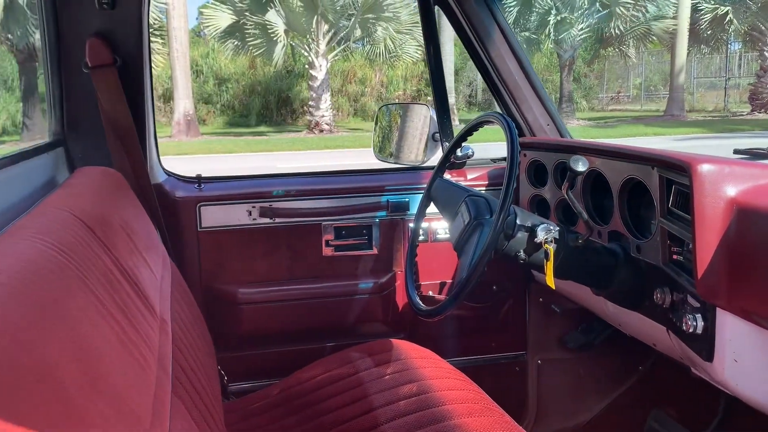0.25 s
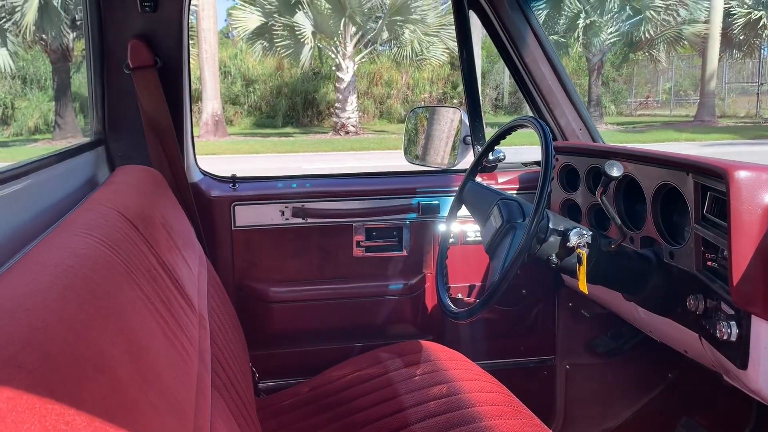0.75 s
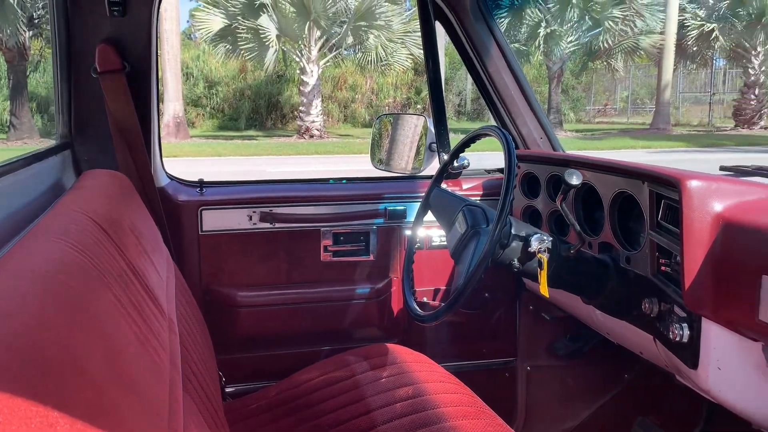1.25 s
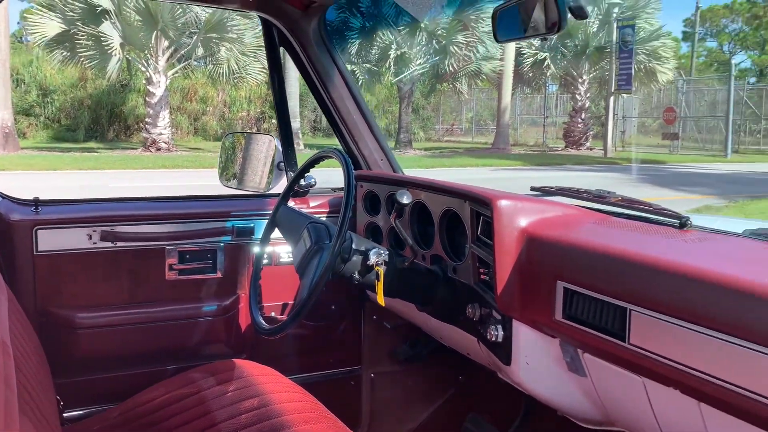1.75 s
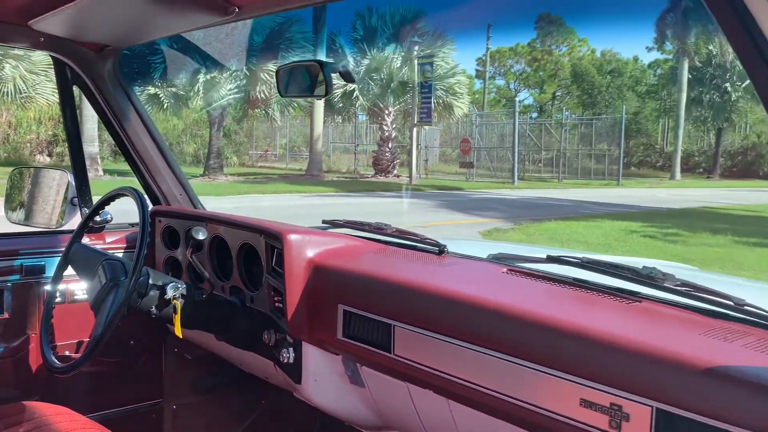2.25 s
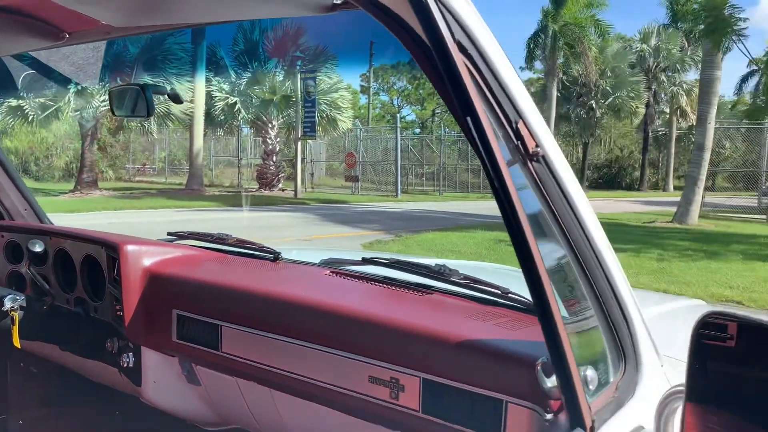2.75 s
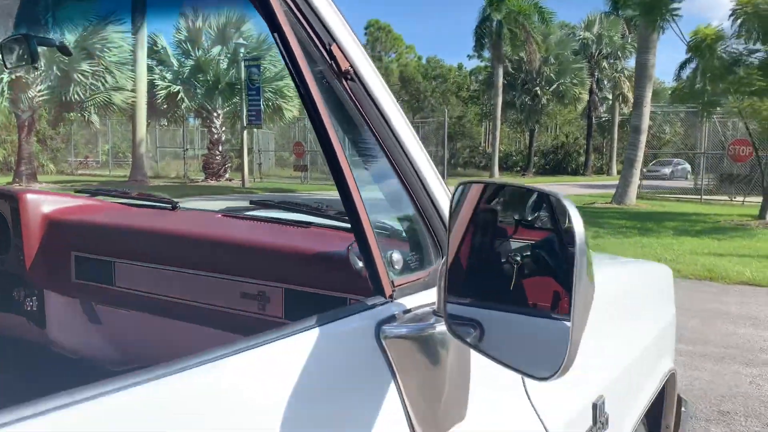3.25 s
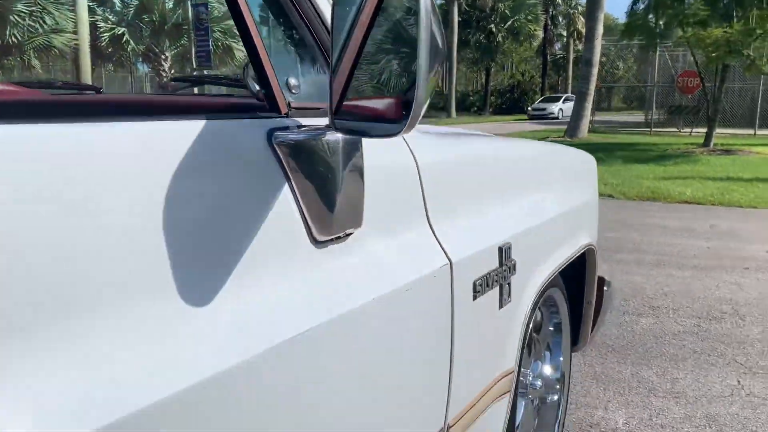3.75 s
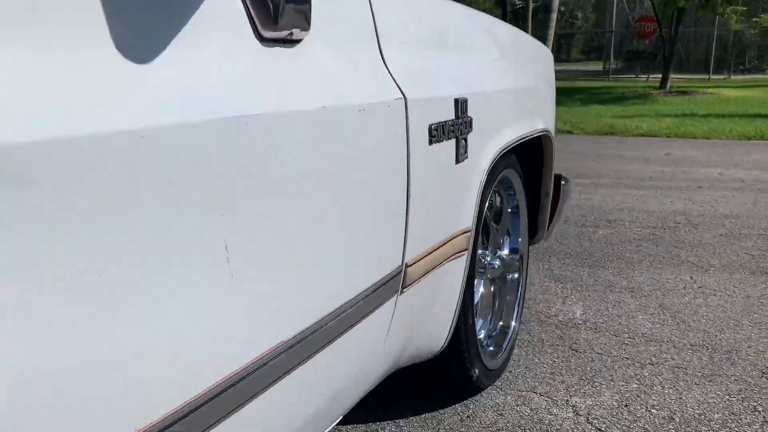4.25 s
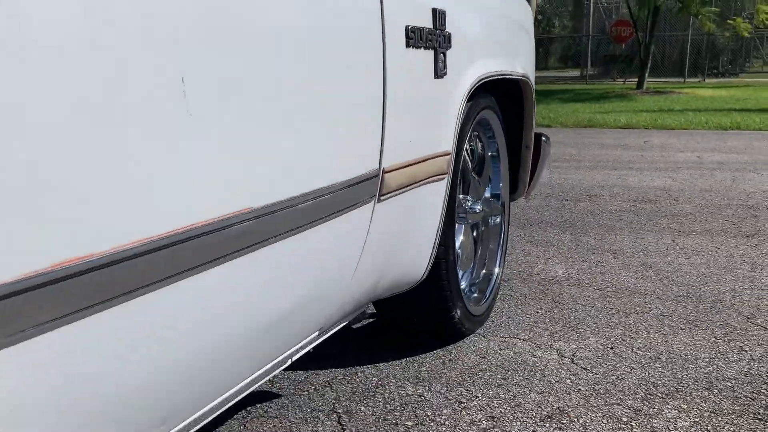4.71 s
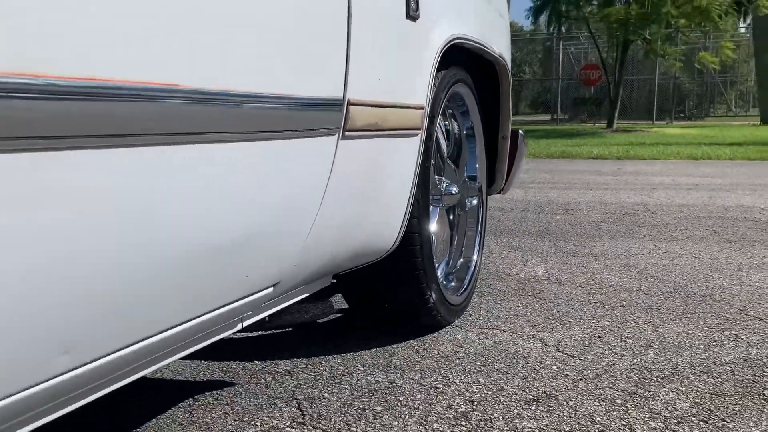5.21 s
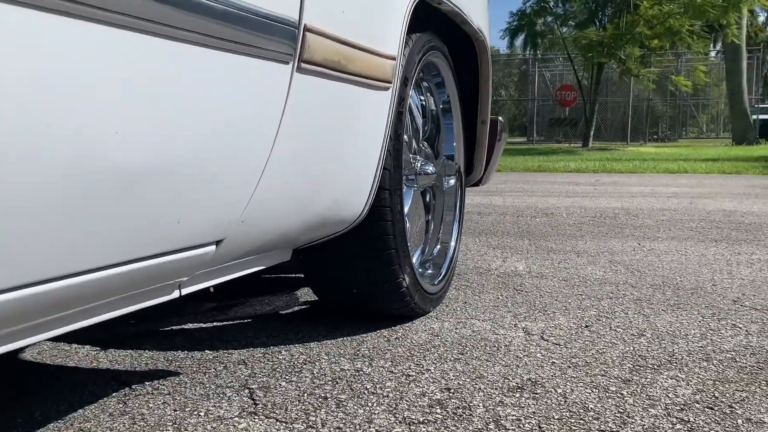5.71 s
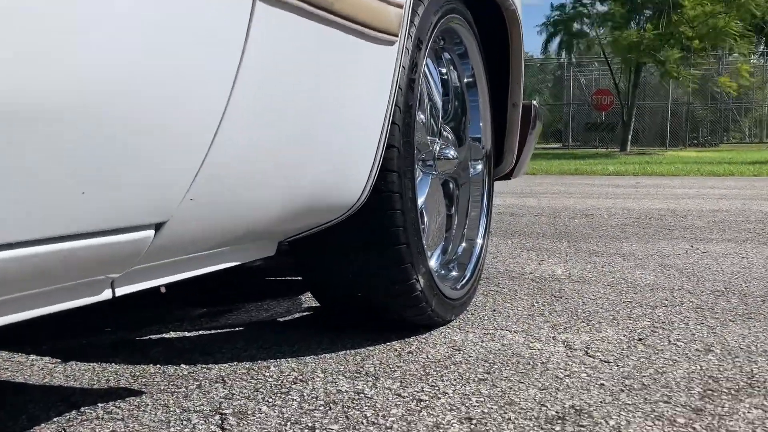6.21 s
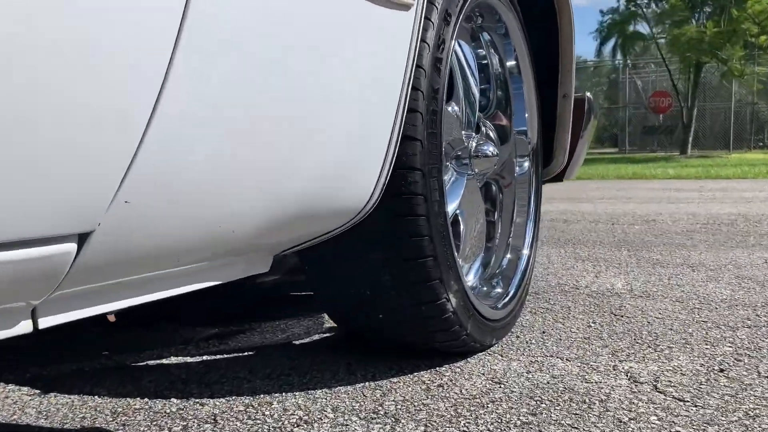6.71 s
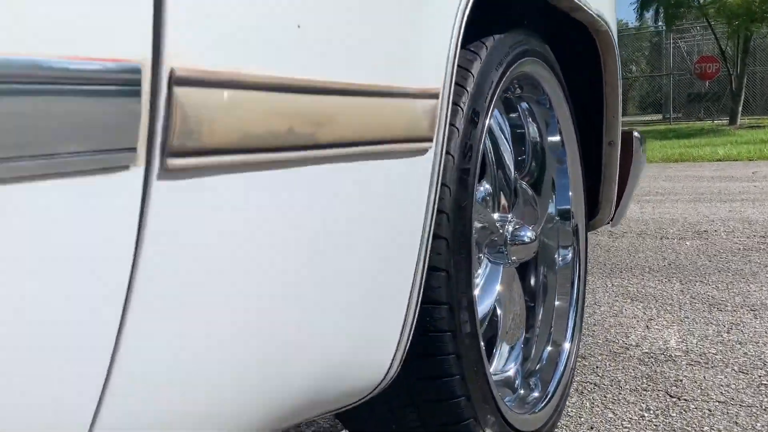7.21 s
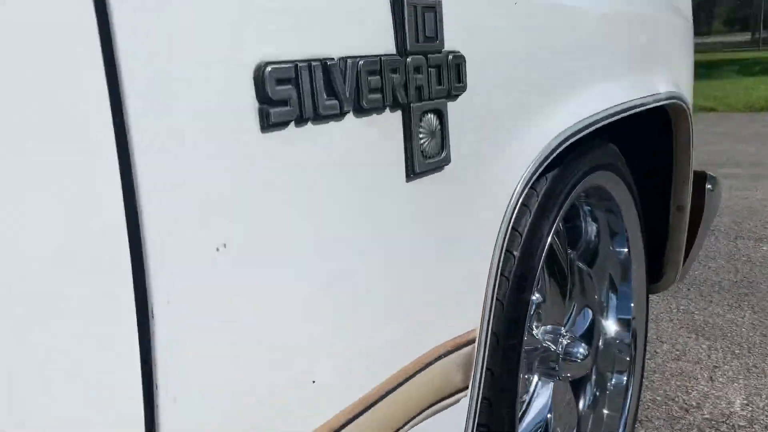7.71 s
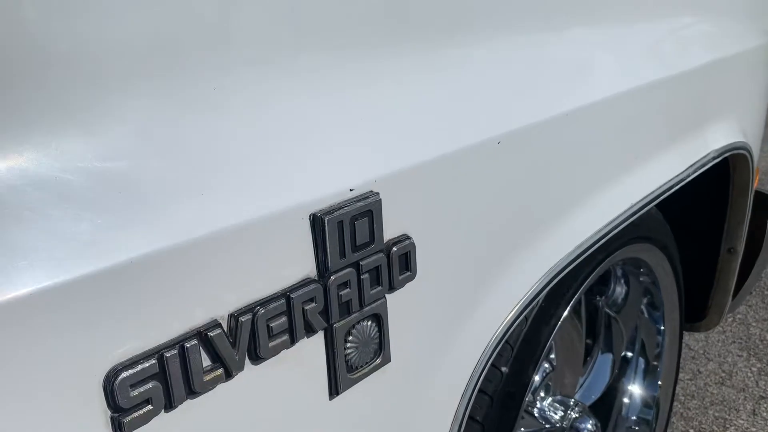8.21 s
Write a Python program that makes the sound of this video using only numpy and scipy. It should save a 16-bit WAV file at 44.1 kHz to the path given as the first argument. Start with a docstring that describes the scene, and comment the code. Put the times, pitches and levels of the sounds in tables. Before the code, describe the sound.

Lumpy low engine idle throbs steadily; a car fades away at the start, and later spitting exhaust leak, fan whirr and ticks come close.

```python
"""Pickup idling in a parking lot

A pickup's V8 lopes at idle; the microphone moves from the cab out to the front wheel.
Eight uneven firings boom in the exhaust as pulses through resonances; a leaking manifold spits puffs of noise
and rings; fan noise and trembling belt tones whirr. The idle hunts and stumbles. A car glides away at the start
as a falling hum and a tyre roar; a far bird chirps and a shoe scuffs the asphalt as short bursts of noise."""
import sys
import numpy as np
from scipy import signal
from scipy.fft import rfft, irfft
from scipy.io import wavfile
from scipy.ndimage import uniform_filter1d

SR = 44100
rng = np.random.default_rng(int(sys.argv[2]) if len(sys.argv) > 2 else 0)


def master_out(mix):
    """Clip the mix to full scale and print it as 16-bit PCM to the path in sys.argv[1]."""
    frames = np.transpose(np.atleast_2d(mix))
    ceiling = np.clip(frames, -1, 1)
    pcm = np.round(ceiling * 32767).astype(np.int16)
    wavfile.write(sys.argv[1], SR, pcm)


N = 373086
TIME, FREQS = np.arange(N) / SR, np.fft.rfftfreq(N, 1 / SR)  # s, Hz


def amp(db):
    """Decibels to gain."""
    return 10 ** (np.asarray(db) / 20)


def unit(x):
    """Scales to rms 1."""
    return x / np.sqrt(np.mean(x ** 2) + 1e-20)


def curve(rows, axis=1):
    """One column of a time table at every sample."""
    columns = np.transpose(rows)
    return np.interp(TIME, columns[0], columns[axis])


def read(points):
    """A table over log frequency at every bin."""
    hz, value = np.transpose(points)
    return np.interp(np.log(FREQS + 1), np.log(hz + 1), value)


def colour(x, spectrum):
    """Filters by a spectrum in dB; rms 1."""
    return unit(irfft(rfft(x) * amp(read(spectrum)), N))


def noise():
    """Two unrelated white noises, one for each port."""
    return rng.standard_normal((2, N))


def resonate(x, hz, width_hz):
    """A steep two-stage resonance, fixed or gliding; rms 1."""
    turn = np.exp(2j * np.pi * np.cumsum(hz * np.ones(x.shape[-1])) / SR)
    r = np.exp(-np.pi * abs(width_hz) / SR)
    # shift the resonance down to 0 Hz, smooth there, shift back
    shifted = x / turn + 1e-18
    smooth = signal.lfilter([1], [1, -2 * r, r * r], shifted)
    return unit((turn * smooth).real)


def clicks(times, sizes):
    """One impulse at each time."""
    inside = (times >= 0) & (times < TIME[-1])
    return np.bincount((times[inside] * SR).astype(int), sizes[inside], N)


def puffs(train, rise_s, t60, steady):
    """Each impulse lets out a puff of noise, over a steady flow; t60 in s."""
    t = TIME[:SR // 4]
    shape = (1 - np.exp(-t / rise_s)) * np.exp(-np.log(1000) * t / t60)
    flow = unit(signal.oaconvolve(train, shape)[:N])
    return noise() * np.sqrt(flow ** 2 + steady ** 2)


def bursts(rows, grit_db):
    """Short swells of gritty noise, each through its own resonance."""
    out = np.zeros((2, N))
    for s, length, db, hz, width in rows:
        grit, size = rng.standard_normal((2, 2, SR // 2))
        count = int(np.clip(length * SR, 32, SR // 4))
        body = resonate(grit * amp(grit_db * size), hz, width)
        sound = unit(resonate(body, hz, 3 * width)[:, -count:])
        swell = np.sin(np.linspace(0, np.pi, count))
        part = out[:, int(s * SR):][:, :count]
        part += (amp(db) * sound * swell)[:, :part.shape[1]]
    return out


def mottle(x, depth_db, size, count):
    """Random peaks and dips of colour above the bass; each is size / 2 samples times count long."""
    hz, _, z = signal.stft(x, SR, nperseg=size)
    patches = rng.standard_normal(z.shape[:0:-1]).T
    patches = uniform_filter1d(patches, count, axis=1)
    patches = unit(uniform_filter1d(patches, size=3, axis=0))
    depth = depth_db * np.clip(hz / 800, 0, 1)[:, None]
    gain = amp(depth * patches - depth ** 2 / 10)  # the second term offsets the mean rise in power
    return signal.istft(z * gain, SR, nperseg=size)[1][:, :N]


def path(db, cab_db, sill_db, falloff):
    """Gain from a source to the microphone: distance weakens it, the cab shades it, the sill gap lets it out."""
    # the microphone's walk: t/s, distance from the engine/m
    distance = [(2, 3.25), (2.7, 2.24), (3.4, 1.83), (4.3, 1.33), (5.1, 0.99), (6.1, 1.01), (6.7, 0.91),
                (7.4, 0.95), (8.46, 1.35)]
    # how far the cab shelters the microphone: t/s, share [0-1]
    in_cab = [(.3, 0.85), (1, 1), (1.6, 0.95), (2.1, 0.56), (2.6, 0.4), (3.2, 0.21)]
    # how open the gap under the sill is to the microphone: t/s, share [0-1]
    under_sill = [(2.6, 0), (4, 0.54), (4.6, 1), (6.8, 0.97), (7.15, .1), (8.46, 0)]
    spreading = np.maximum(curve(distance), .1) ** -falloff
    return amp(db + cab_db * curve(in_cab) + sill_db * curve(under_sill)) * spreading


def ports(pair):
    """Turns two unrelated versions of a sound into what the two microphone ports get."""
    # correlation between the ports: f/Hz, likeness [0-1]
    likeness = [(100, 0.76), (250, 0.96), (500, 0.69), (1000, 0.72), (2500, 0.14), (4500, 0.086),
                (6200, 0.21), (7500, 1), (15000, 0.93)]
    # tilt between the ports: f/Hz, left minus right level/dB
    lean = [(60, -3.5), (250, 3), (1000, 0.4), (2500, 1), (3600, 2.5), (4500, -3), (6000, -2), (8000, -0.5),
            (15000, 0.5)]
    # phase between the ports: f/Hz, lead of the left/rad
    port_phase = [(0, 0), (100, .15), (250, .3), (500, .6), (1000, 1.4), (2760, 1.7), (5000, 2), (6100, 0),
                  (15800, -12.57)]
    a, b = rfft(pair)
    same = np.clip(read(likeness), -1, 1)
    lag = np.interp(FREQS, *np.transpose(port_phase))
    right = (same * a + np.sqrt(1 - same ** 2) * b) * np.exp(-1j * lag)
    return irfft(np.array([a, right]) * amp(np.outer([.5, -.5], read(lean))), N)


def stirring_air(air_db=-36):
    """Air stirring at the ports: low noise, unrelated left and right."""
    # spectrum of the air noise: f/Hz, density/(dB per Hz)
    air = [(8, -13), (25, -8), (45, -26), (63, 11), (110, -12), (250, -8), (1000, -63)]
    return amp(air_db) * colour(noise(), air)


def passing_car(hum_db=-2, tyres_db=-7):
    """A hum that glides down and a tyre roar, both fading as the car leaves."""
    # the car going by: t/s, level before the hum and tyre offsets/dB, pitch of the hum f/Hz
    car = [(0, -20, 322), (.05, -27.5, 310), (.1, -26, 240), (.16, -27.5, 194), (.27, -27.5, 189),
           (.36, -31.5, 199), (.7, -42, 181), (1.2, -84, 180)]
    # spectrum of the tyre roar: f/Hz, density/(dB per Hz)
    tyres = [(150, 1), (400, 4.5), (700, -7.5), (890, 5.5), (1030, -1), (1250, 2.5), (1600, -12),
             (2400, -16.5), (5000, -26), (14000, -36)]
    hum = resonate(noise(), curve(car, axis=2), 60)
    roar = colour(noise(), tyres)
    return (amp(hum_db) * hum + amp(tyres_db) * roar) * amp(curve(car))


def far_bird():
    """Two faint chirps, each a short swell of noise through a resonance."""
    # the chirps: t/s, length/s, level/dB, centre f/Hz, width/Hz
    chirps = [(.95, .04, -54, 4250, 450), (1.113, 0.058, -57, 4300, 60)]
    return bursts(chirps, grit_db=2)


def scuffs_and_bumps():
    """A shoe on asphalt as gritty bursts, and soft low bumps as smoother, deeper ones."""
    # shoe scuffs: t/s, length/s, level/dB, centre f/Hz, width/Hz
    scuffs = [(2.143, 0.0092, -47, 1610, 2000), (2.595, 0.054, -39.5, 2430, 2000),
              (5.663, 0.0079, -25.5, 1410, 700), (5.795, 0.011, -20, 1180, 1760),
              (5.812, 0.077, -24.5, 1040, 1690), (5.833, 0.016, -13.5, 1020, 790),
              (5.835, 0.032, -20.5, 907, 180), (5.956, .022, -26, 860, 500),
              (6.084, 0.011, -29.5, 2200, 2500)]
    # low bumps: t/s, length/s, level/dB, centre f/Hz, width/Hz
    bumps = [(1.6, 0.21, -17, 70.06, 44.3), (1.865, 0.072, -16.5, 61.3, 60), (4.57, 0.1, -17, 48.7, 30),
             (7.88, .08, -22, 52, 30.44)]
    return bursts(scuffs, grit_db=7) + bursts(bumps, grit_db=1)


def firings():
    """The time of every firing as the idle hunts, and the columns of the cylinder that fires."""
    # hunting idle: t/s, firing rate/(firings per s)
    speed = [(0.0, 49.82), (0.96, 48.09), (1.32, 50.08), (2.17, 48.65), (2.54, 51.66), (2.9, 48.71),
             (3.35, 47.74), (3.67, 51.28), (4.64, 48.88), (4.91, 47.43), (5.44, 50.64), (5.94, 48.14),
             (6.18, 49.81), (6.53, 47.36), (7.07, 50.91), (7.31, 49.46), (7.64, 51.06), (8.46, 48.81)]
    # cylinders in firing order: exhaust pulse level/dB, its lag/ms, leak spit level/dB, spit scatter/dB
    cylinders = [(3.5, -0.66, 5, 2.5), (2.6, -0.9, 10, 5.5), (-0.9, -0.14, -15, 11), (6, 0.47, 9.5, 2),
                 (5, 0.82, -22, 9), (0.5, 0.75, 8, 4.5), (4.5, -0.12, 0, 9), (3, -0.63, 6, 7)]
    turns = np.cumsum(curve(speed)) / SR - .551  # in firings; the first comes as this passes 0
    number = np.arange(int(turns[-1]) + 1)
    return np.interp(number, turns, TIME), np.array(cylinders)[number % len(cylinders)].T


def stumble_db(times):
    """How much weaker each exhaust pulse is while the engine stumbles."""
    # runs of weak firings: t of the middle/s, length/s, depth/dB
    stumbles = [(.325, .07, -3), (0.61, 0.051, -15), (1.473, 0.087, -2), (1.78, .06, -4.5),
                (2.115, 0.062, -4.5), (2.33, .05, -5.5), (2.757, 0.044, -12), (3.042, .11, -6),
                (4.034, 0.056, -6), (4.249, 0.024, -17), (4.726, .035, -6), (5.229, 0.043, -17),
                (5.721, 0.045, -3.5), (5.863, 0.085, -8), (6.065, 0.034, -5), (6.339, 0.1, -5),
                (6.566, .065, -8), (6.694, 0.066, -11.5), (7.202, .03, -5), (8.153, 0.27, -4)]
    return sum(db * np.exp(-(2 * (times - s) / length) ** 2) for s, length, db in stumbles)


def whine(hz, width_hz):
    """A tone whose pitch trembles."""
    tremble = unit(uniform_filter1d(noise(), SR // 100))
    pitch = hz + width_hz / 2 * tremble
    return unit(np.sin(2 * np.pi * np.cumsum(pitch, axis=1) / SR))


def engine_bay(times, whine_db=-1.5):
    """Fan rush with the even patter of the valve gear, and whining pulleys."""
    # spectrum of fan and valve gear: f/Hz, density/(dB per Hz)
    bay = [(60, -13), (200, 2.5), (400, 1), (560, -1.5), (800, -2.5), (1050, -2.5), (1350, -5),
           (2000, -9.5), (3000, -15), (4500, -21), (7000, -26.5), (15000, -52)]
    # whining pulleys: f/Hz, width of the tremble/Hz, level before beam and whine_db/dB
    whines = [(736, 41.9, -10.5), (974, 40, -8.5), (1127, 30.8, -18.5), (1656, 21.8, -28)]
    # the two lowest whines beam out under the fender: t/s, gain of the first/dB, of the second/dB
    fender_beam = [(2, -23, -2.5), (4.2, -18, -1), (5.2, 0, 0.5), (6.3, 5.5, -6), (7, 3.5, 3.5),
                   (7.6, -11, -1), (8.46, -9, 3)]
    valves = np.concatenate([times, times[1:] - np.diff(times) / 2])  # two valves close for each firing
    patter = clicks(valves, amp(rng.uniform(-5, 5, len(valves))))
    rush = colour(puffs(patter, 0.00038, 0.12, 0.87), bay)
    tones = [amp(db) * whine(hz, width) for hz, width, db in whines]
    beaming = tones[0] * amp(curve(fender_beam, axis=1)) + tones[1] * amp(curve(fender_beam, axis=2))
    pulleys = beaming + sum(tones[2:])
    return (rush + amp(whine_db) * pulleys) * path(db=-30.5, cab_db=-4.5, sill_db=0.6, falloff=0.93)


def ring(train, mode):
    """One mode of the manifold, struck by a train of impulses."""
    hz, db, t60 = mode
    t = TIME[:SR // 8]
    return signal.oaconvolve(train, np.sin(2 * np.pi * hz * t) * amp(db - 60 * t / t60))[:N]


def leak(times, spit_db, scatter_db, tick_db=-10, tick_scatter_db=5):
    """Each firing pushes a puff of gas out of the leaking manifold, unevenly by cylinder, and the metal ticks."""
    # low part of the jet: f/Hz, density/(dB per Hz)
    hiss_spectrum = [(1200, -40), (2400, -10), (3400, -8), (3900, 1), (4500, -0.5), (5700, -6.5),
                     (7000, -5), (8200, -5.5), (10000, -9.5), (15000, -23)]
    # high part of the jet: f/Hz, density/(dB per Hz)
    sizzle_spectrum = [(4000, -23), (6500, -2.5), (8200, -3), (9300, 1), (10000, -1), (11000, 1),
                       (12300, -3.5), (14000, -3.5), (15800, -7.5)]
    # the hardest spits: t/s, level/dB
    hard_spits = [(4.279, 13), (6.034, 13.5), (6.235, 5), (6.356, 11), (6.563, 9)]
    # ringing modes of the manifold: f/Hz, level/dB, t60/s
    manifold = [(3840, -0.5, 0.041), (4200, 1, 0.041), (4350, -9, .025)]
    # the loudest pings of the hot manifold: t/s, level before the modes' own/dB
    loud_pings = [(3.399, -31), (3.6, -37), (3.77, -34), (4.348, -29), (6.794, -22)]
    luck, *knocks = rng.standard_normal((len(times), 1 + len(manifold))).T
    train = clicks(times, amp(spit_db + scatter_db * np.tanh(2 * luck)))
    hiss = colour(puffs(train, 0.0064, 0.12, 0.95), hiss_spectrum)
    hard_at, hard_db = np.transpose(hard_spits)
    hard_train = clicks(hard_at, amp(hard_db))
    sizzle = colour(puffs(train + hard_train, 0.00096, 0.037, 0.59), sizzle_spectrum)
    # the microphone crosses the beam of the jet
    jet_at_s, jet_length_s, jet_db = 6.65, 0.97, 5
    beam = amp(jet_db * np.exp(-(2 * (TIME - jet_at_s) / jet_length_s) ** 2))
    sizzle = sizzle * beam * path(db=-35, cab_db=-26, sill_db=3.5, falloff=1.1)
    # the metal ticks faintly with every firing, and now and then pings loudly
    tick_trains = [clicks(times, amp(tick_scatter_db * knock)) for knock in knocks]
    ticks = unit(sum(ring(ticking, mode) for ticking, mode in zip(tick_trains, manifold)))
    at, db = np.transpose(loud_pings)
    pings = sum(ring(clicks(at, amp(db)), mode) for mode in manifold)
    near = path(db=-36.0, cab_db=-13.5, sill_db=1.0, falloff=0.95)
    jet = (hiss + amp(tick_db) * ticks) * near + sizzle
    return mottle(jet, depth_db=3.5, size=256, count=5) + pings  # the colour shifts from spit to spit


def exhaust(times, pulse_db, lag_ms, scatter_db=1.44, jitter_ms=0.45, rough=0.88,
            boom_db=1.0, drone_db=2.5, lope_db=-34):
    """Uneven pulses ring the pipe's boom, a drone an octave below and a gassy burble above; they lope low down."""
    # exhaust boom: t/s, level before boom_db/dB
    boom_level = [(0, -23), (1.2, -22), (2.6, -16.5), (3.3, -18.5), (3.75, -14.5), (4.9, -15), (5.5, -12),
                  (7.5, -12), (8.46, -14)]
    # drone near the firing rate, strongest inside the cab: t/s, level before drone_db/dB
    drone_level = [(0, -22), (1.1, -21), (1.9, -22.5), (2.5, -35.5), (3.3, -33), (3.7, -28.5), (7.5, -29),
                   (8.46, -29)]
    # upper resonances of the exhaust: f/Hz, width/Hz, level against each other/dB
    pipe = [(144.7, 23, -4), (176.8, 36.2, 5), (207.4, 23.8, 5.5), (265.5, 31, -4), (313.4, 31.3, -1.5),
            (391, 26, -10)]
    strength, slip = rng.standard_normal((len(times), 2)).T
    sizes = amp(pulse_db + stumble_db(times) + scatter_db * strength)
    train = clicks(times + (lag_ms + jitter_ms * slip) / 10 ** 3, sizes)
    train = colour(train, [(10, -37), (35, -28), (58, -0.5), (75, 1.5), (125, 4), (150, -8), (220, -12.5),
                           (600, -33)])
    boom = resonate(train, 99.4, 46.7) * amp(curve(boom_level) + boom_db)
    drone = colour(resonate(train, 46.4, 15.6), [(20, 3), (42, -1), (60, -1.5), (100, 5.0)])
    drone = drone * amp(curve(drone_level) + drone_db)
    # the lope is the unevenness alone: each pulse's departure from the mean
    uneven = clicks(times, sizes - sizes.mean())
    lope = colour(uneven, [(14, -43), (30, -9), (43, 0), (60, 6), (90, -22), (250, -72)]) * amp(lope_db)
    gas = puffs(clicks(times, amp(pulse_db)), 0.0024, 0.03, 0.71)
    burble = sum(amp(db) * (resonate(train, hz, width) + rough * resonate(gas, hz, width))
                 for hz, width, db in pipe)
    return boom + drone + lope, unit(burble) * path(db=-32.5, cab_db=-2.0, sill_db=5.5, falloff=0)


def scene():
    """The bass reaches both ports in step; engine and car are mottled, as by shifting echoes from body and ground."""
    # the exhaust lies to the left: t/s, left minus right level/dB
    exhaust_side = [(1.2, 2.6), (1.8, 0.5), (4.5, 2), (5.3, 3), (6.8, 3.5), (7.7, 2.2)]
    times, (pulse_db, lag_ms, spit_db, scatter_db) = firings()
    bass, burble = exhaust(times, pulse_db, lag_ms)
    engine = burble + engine_bay(times) + leak(times, spit_db, scatter_db)
    mottled = mottle(engine + passing_car(), depth_db=2.5, size=1024, count=14)
    bass_pair = bass * amp(np.outer([.5, -.5], curve(exhaust_side)))
    return bass_pair + ports(mottled + scuffs_and_bumps() + far_bird()) + stirring_air()


def record(dry, ceiling_db=-7.5):
    """A soft limiter, steered by the left port, rounds off the strongest throbs; then the band limit."""
    edge_hz = 15850
    power = uniform_filter1d(dry[0] ** 2, SR // 50)  # over 20 ms
    limited = dry / (1 + (power / amp(ceiling_db) ** 2) ** 4) ** (1 / 8)
    lowpass = signal.firwin(511, edge_hz, window=("kaiser", 9), fs=SR)
    return signal.oaconvolve(limited, lowpass[None], "same")


dry = scene()
out = record(dry)
master_out(out)
```